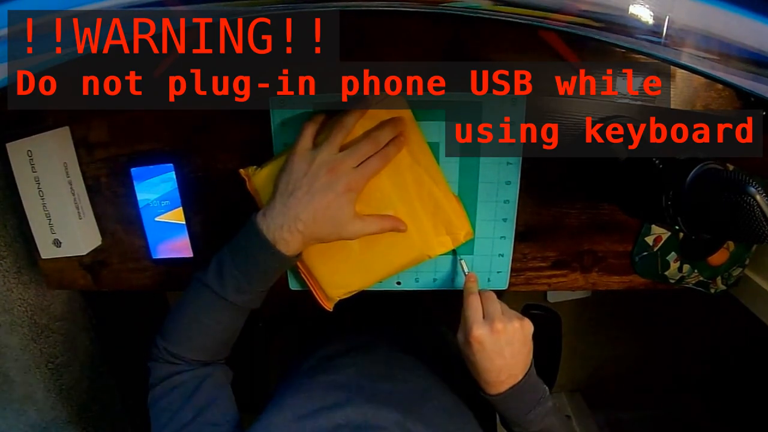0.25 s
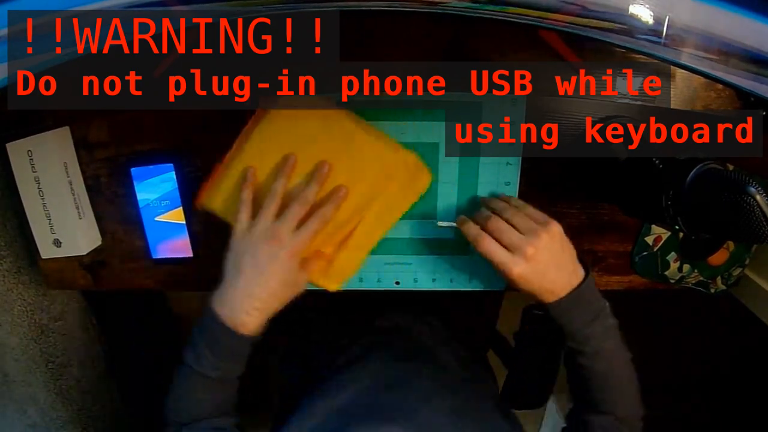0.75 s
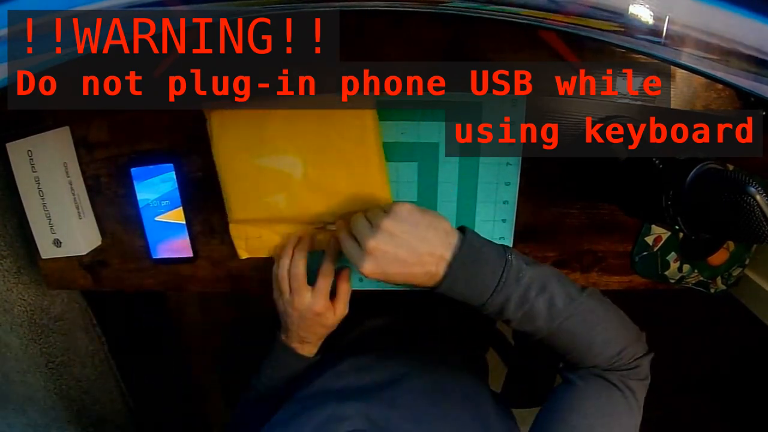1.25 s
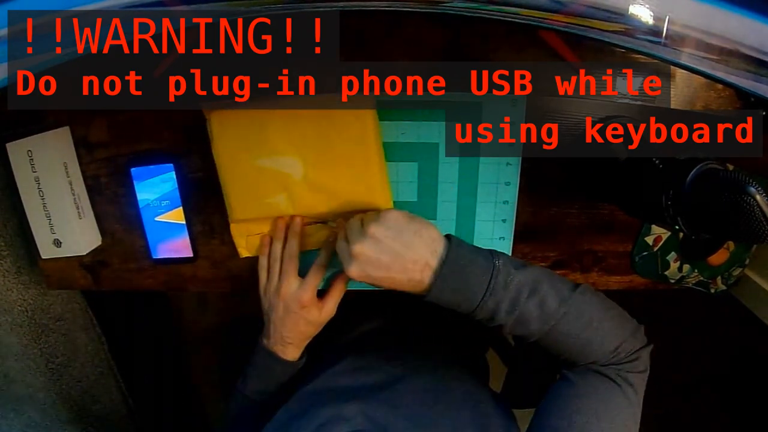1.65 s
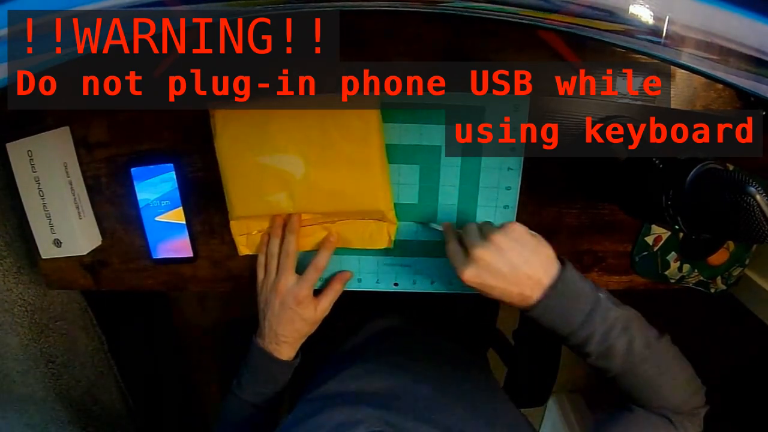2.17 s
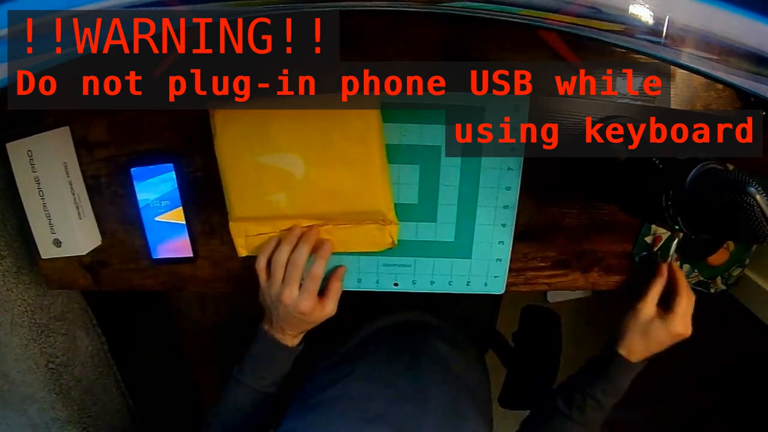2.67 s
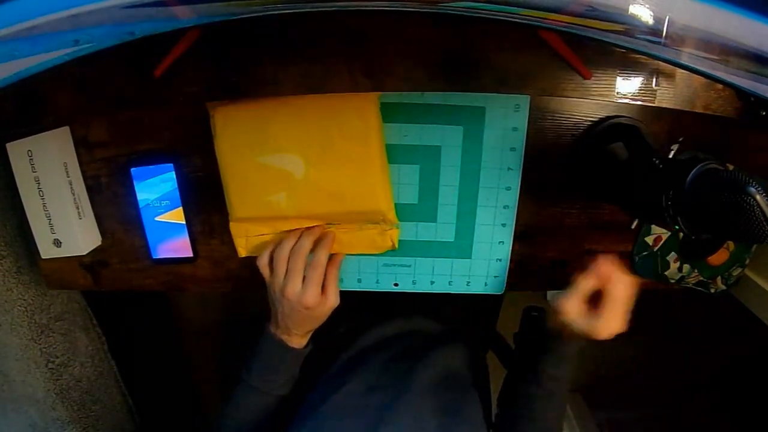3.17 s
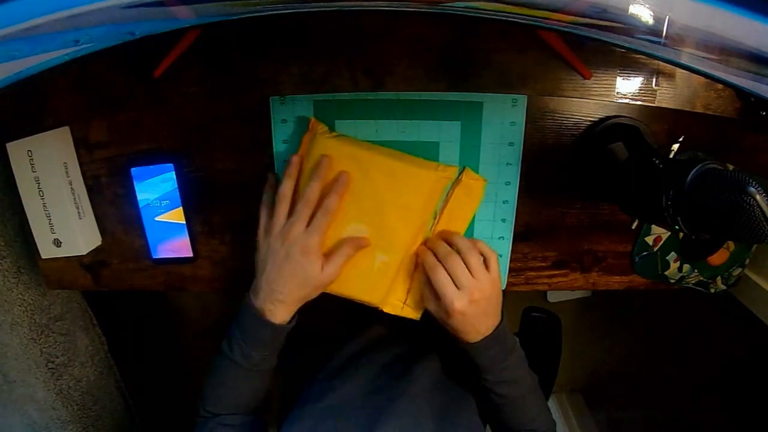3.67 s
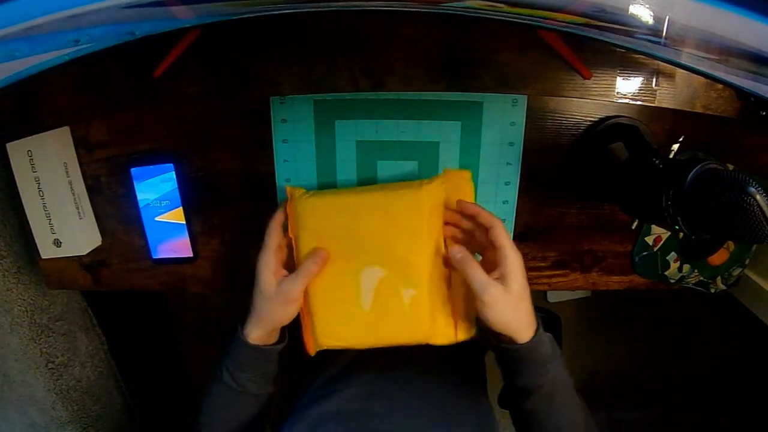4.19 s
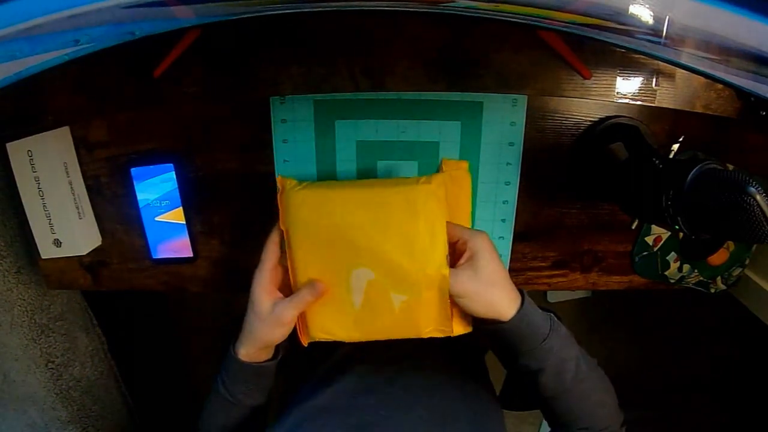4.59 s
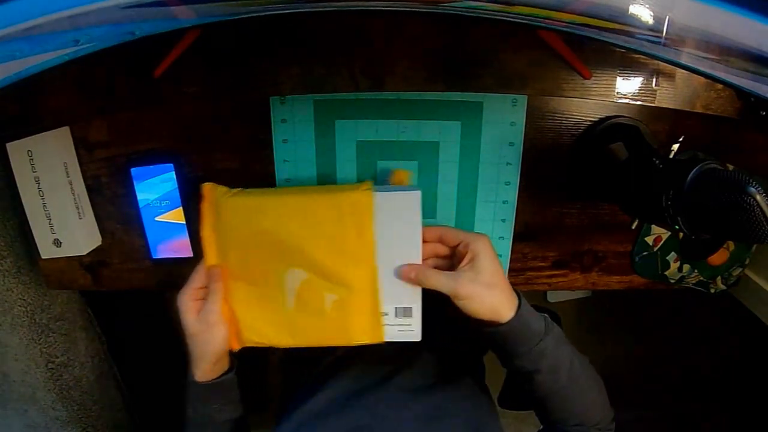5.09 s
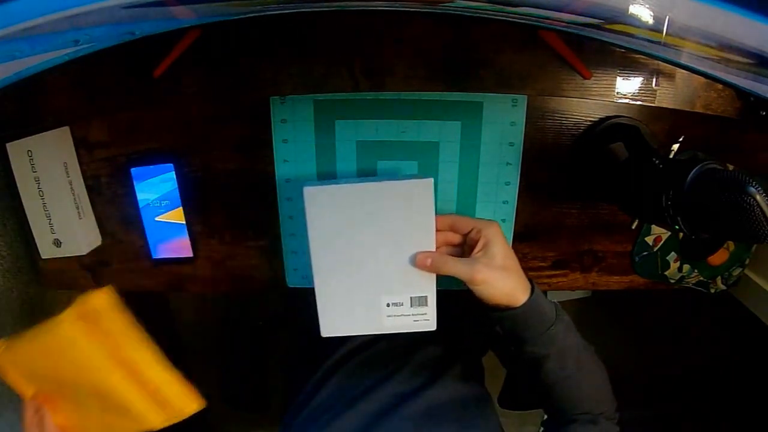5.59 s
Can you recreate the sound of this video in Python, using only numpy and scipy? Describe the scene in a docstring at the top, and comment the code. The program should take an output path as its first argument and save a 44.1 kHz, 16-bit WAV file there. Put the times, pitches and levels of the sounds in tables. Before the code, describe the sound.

In a small, quiet room, hands shift a padded paper envelope in uneven, crackly bursts, then cut it open with a brief rasp. Two dull knocks ring the desk top, and the paper rustles and snaps again as it is opened and emptied. Deep thumps from the movements reach the nearby microphone through its desk stand, and the sound cuts out once, very briefly, early on.

```python
"""At a desk in a small, quiet room, a padded paper mailer is turned, slit and emptied.
The paper rustles as its fibres slip in many tiny jerks, and snaps when a crease buckles.
Knocks make the desk top ring. The desk also carries the microphone arm, which sways at two
low pitches when pushed. The sound drops out once for a fifth of a second."""
import sys
import numpy as np
from scipy import signal
from scipy.fft import rfft, irfft
from scipy.io import wavfile
from scipy.ndimage import uniform_filter1d

SR = 44100
rng = np.random.default_rng(int(sys.argv[2]) if len(sys.argv) > 2 else 0)


def store_pcm(level_fs):
    """Save levels as 16-bit WAV."""
    pcm = np.round(np.clip(level_fs, -1, 1) * 32767).astype(np.int16)
    wavfile.write(sys.argv[1], SR, np.atleast_2d(pcm).T)


N = 257544


def undb(db):
    """Turn decibels into a factor to multiply by."""
    return 10 ** (np.asarray(db) / 20)


def unit(x):
    """Scale a signal to an average power of 1."""
    return x / np.sqrt(np.mean(x ** 2))


def band(x, hz, width):
    """Keep the sound near one pitch, in a band `width` Hz wide."""
    return signal.lfilter(*signal.iirpeak(min(hz, .4 * SR), hz / width, fs=SR), x)


def walk(rate):
    """A smooth random wobble of size about 1 that takes `rate` new values a second."""
    hold = int(SR / rate)
    steps = np.repeat(rng.standard_normal(N // hold + 1), hold)
    return unit(uniform_filter1d(uniform_filter1d(steps, hold), hold)[:N])


def add(out, s, sound):
    """Mix a sound in at s seconds."""
    start = int(s * SR)
    out[start:start + len(sound)] += sound[:N - start]


def swell(s, db, rise_s, hold_s, fall_s, bend=0.):
    """Power of one movement: rise, hold, fall. Slopes take rise_s and fall_s per 20 dB, less if bent."""
    t = np.arange(N) / SR - s
    before, after = -t / max(rise_s, .002), (t - hold_s) / max(fall_s, .01)
    away = np.maximum(np.maximum(before, after), 0)
    return undb(2 * db - 40 * away * (1 + bend * away))


def air():
    """Quiet, mostly deep room noise and a faint hum."""
    # how strong the noise is from low to high: (pitch [Hz], relative level [dB])
    noise_shape = [(47, -28), (80, -2.5), (133, 0), (395, -16.5), (575, -26), (672, -27), (751, -25.5),
                   (1820, -39), (6590, -42.5), (16000, -49.5)]
    # tones of the hum: (pitch [Hz], level [dB])
    hum_tones = [(120, -71.5), (265, -77)]
    noise_db, t = -63.5, np.arange(N) / SR
    shape_hz, shape_db = np.array(noise_shape).T
    hz = np.fft.rfftfreq(N, 1 / SR) + 1
    colour = undb(np.interp(np.log(hz), np.log(shape_hz), shape_db))
    hum = sum(undb(db + 2 * walk(12)) * np.sin(2 * np.pi * pitch * t) for pitch, db in hum_tones)
    return undb(noise_db) * unit(irfft(rfft(rng.standard_normal(N)) * colour, N)) + hum


def room(x):
    """Add the short echo of a small room, duller than the direct sound."""
    echo_db, fade_s = -20, .15
    t = np.arange(int(.3 * SR)) / SR
    tail = band(rng.standard_normal(len(t)), 1990, 8500) * undb(-60 * t / fade_s) * (t > .004)
    return x + undb(echo_db) * signal.fftconvolve(x, tail / np.linalg.norm(tail))[:N]


def arm_levels():
    """Levels in dB of the arm's slow and quick sway: each push builds up, holds and dies away."""
    # pushes on the arm: (time of full swing [s], slow sway [dB], quick sway [dB], hold [s])
    pushes = [(0.0, -33.5, -38.5, 0.004), (0.16, -35.5, -37, 0.0054), (0.393, -36.5, -34, 0.021),
              (0.492, -29, -39, 0.0038), (0.608, -36, -36, .005), (0.729, -38.5, -50, .005),
              (0.854, -40.5, -44.5, .03), (0.996, -53.5, -53.5, 0.027), (1.125, -42, -41, 0.18),
              (1.54, -50, -58, 0.087), (1.713, -29, -31, 0.0033), (1.863, -46, -51, 0.18),
              (2.07, -48, -32, 0.096), (2.165, -32.5, -42.5, 0.14), (2.291, -31, -30, 0.004),
              (2.488, -45.5, -47.5, 0.075), (2.628, -48, -47, 0.023), (2.722, -47.5, -64, .005),
              (2.86, -52, -71.5, 0.17), (3.216, -49, -48.5, 0.0045), (3.408, -44.5, -46, 0.08),
              (3.724, -54, -51, 0.09), (3.948, -26.5, -28, 0.038), (4.096, -34.5, -40, 0.0046),
              (4.205, -36, -42.5, 0.019), (4.314, -38, -45, 0.0062), (4.45, -48, -52.5, 0.087),
              (4.582, -47, -64, 0.033), (4.655, -39, -45, .005), (4.707, -36.5, -45.5, 0.072),
              (4.864, -36, -34, 0.027), (5.0, -41.5, -55, .03), (5.09, -52, -46, .03),
              (5.17, -29, -31.5, 0.0056), (5.328, -35, -40, 0.0046), (5.495, -33, -34.5, 0.021),
              (5.645, -46, -51, 0.061), (5.796, -48, -48.5, 0.047)]
    rise_s, slow_fall_s, quick_fall_s = .03, .16, .12
    slow_rest_db, quick_rest_db = -59.5, -68.5
    slow, quick = undb(2 * slow_rest_db), undb(2 * quick_rest_db)  # doubling the dB gives power
    for s, slow_db, quick_db, hold_s in pushes:
        slow = slow + swell(s, slow_db, rise_s, hold_s, slow_fall_s)
        quick = quick + swell(s, quick_db, rise_s, hold_s, quick_fall_s)
    return 10 * np.log10(slow), 10 * np.log10(quick)


def arm_sway(slow_db, quick_db):
    """The arm swings at two low pitches that wander at random; a dull rumble follows the slow one."""
    slow_hz, quick_hz, wander, rumble_db = 43.3, 63, .0854, -7.5
    tones = 0
    for hz, db in (slow_hz, slow_db), (quick_hz, quick_db):
        pitch = hz * (1 + wander * walk(12))
        tones = tones + undb(db) * np.sqrt(2) * np.sin(2 * np.pi * np.cumsum(pitch) / SR)
    rumble = unit(band(band(rng.standard_normal(N), 35, 27), 38, 38))
    return tones + undb(slow_db + rumble_db) * rumble


def desk_drone(paper_db, arm_db):
    """Sliding paper and the swaying arm keep the desk top humming near its strongest tone."""
    power = undb(2 * (paper_db - 10.5)) + undb(2 * (arm_db - 25.5))
    return np.sqrt(power) * unit(band(band(rng.standard_normal(N), 186, 70), 186, 70))


def desk_knocks():
    """Each knock rings the desk top's own tones; a harder knock favours the high ones."""
    # knocks on the desk: (time [s], level [dB], hardness [dB per octave])
    knocks = [(0.388, -33.5, -14), (0.474, -40.5, 0), (0.594, -43.5, 6), (1.711, -28, -2), (2.174, -43, -5),
              (3.296, -24.5, 2), (3.407, -24.5, 6.5), (3.937, -43.5, -6), (4.016, -42.5, -6),
              (4.185, -42.5, 6), (4.861, -42, 2), (5.02, -45, 16.5), (5.116, -48, 12), (5.365, -51, 11),
              (5.475, -43, 6.5), (5.719, -46, 7)]
    # tones of the desk top: (pitch [Hz], level [dB], time to fade by 60 dB [s])
    desk_tones = [(191.4, 1.5, 0.19), (202, -0.5, 0.086), (135, -8.5, 0.15), (309, -7, 0.098),
                  (407, -16, 0.044), (570, -16.5, 0.081)]
    out, t = np.zeros(N), np.arange(12000) / SR
    main_hz, onset = desk_tones[0][0], 1 - np.exp(-t / .0039)
    for s, db, hardness in knocks:
        ring = 0
        for hz, tone_db, fade_s in desk_tones:
            fading = undb(tone_db + hardness * np.log2(hz / main_hz) - 60 * t / fade_s)
            ring = ring + fading * np.sin(2 * np.pi * hz * t)
        add(out, s, undb(db) * ring * onset)
    return out


def handling():
    """Strokes set the rustle's level; the loudest ones decide its brightness, weight and crackle."""
    # strokes of hand and blade on the paper: (time of full level [s], level [dB], rise [s], hold [s],
    # fall [s], brightness of the highs [dB], weight of the lows [dB], crackle [dB])
    strokes = [(0.0, -36.5, .05, 0.0014, 0.02, -10, 5, 1), (0.09, -52, 1, .02, 0.12, -15, 5.5, 1.5),
               (0.2, -46.5, 0.8, 0.025, 0.11, -18.5, -10.5, 2),
               (0.385, -43, .01, 0.023, 0.06, -11, 4.5, 2.5),
               (0.474, -57.5, -0.05, .03, -0.02, -12, 10, 1.5), (0.603, -58, 0.26, 0.018, 0.12, -10, 5, 2),
               (0.7, -67.5, 0.3, 0.076, 0.2, -8.5, 2, 2.5), (0.81, -55.5, 0.08, 0.018, -0.01, -3, 9, 1.5),
               (0.856, -42.5, .08, .13, 0.105, -7.5, -5.5, 0.8), (1.096, -58, -0.16, .015, 0.1, -2.5, 2, 2),
               (1.514, -58, 0, 0.0029, 0.2, -14.5, 4, 2), (1.677, -61, 0.2, 0.039, -0.2, -4.5, -2, 3.5),
               (1.708, -43.5, 0.0268, .01, 0.13, -11.5, 5.5, 3.5), (1.871, -62.5, .1, .04, -1.5, -5, -5, 4),
               (1.95, -54.5, 0.07, .03, 0.53, -2, -1, 4.5), (1.999, -43, 0.0567, 0.17, -0.01, -4, 2, 1.5),
               (2.16, -35, 0.1948, .085, 0.0757, -6, 7.5, 2.5),
               (2.302, -53.5, 0.7, .01, 0.23, -20.5, -4, 2.4), (2.545, -59.5, 0.12, .02, 0.14, -4.5, 1, 1),
               (2.678, -58, 0.46, .02, 0.13, -7, -8, 2), (2.84, -69.5, -0.7, 0.011, 0.3, -2.5, 17, 2),
               (3.193, -67.5, -1, 0.041, -0.55, -4, -4, 2.5), (3.3, -72, 0.07, .055, 0.3, -12, 22, 1.5),
               (3.361, -42, 0.01, .015, 0.0761, -29, 12, 2), (3.406, -35.5, 0.0179, 0.026, .13, -6.5, 0, 3),
               (3.46, -37, .045, 0.032, 0.1062, -22, -2, 1.4), (3.67, -63, 0.15, .03, 0.15, -2.5, -8, 3.5),
               (3.85, -69.5, 0.2, 0.036, .1, 0.5, 2, 3), (3.935, -64.5, 0.06, .015, -0.2, 2, -3, 2.5),
               (4.008, -52, 0.04, .01, 0.8, -8.5, 0.5, 2.5), (4.12, -53.5, .1, 0.059, -0.07, 2, -2, 1.5),
               (4.2, -42.5, 0.04, 0.027, 0.08, -4, -0.5, 0.8),
               (4.29, -51.5, 0.11, 0.065, 0.06, 1, -3.5, 0.5), (4.4, -55.5, .1, .04, 0, -1.5, .6, 0.2),
               (4.575, -61.5, -0.3, 0.046, .1, 2, -1.5, 2), (4.635, -51, -0.1, .03, -0.1, 0, 7, 2),
               (4.7, -52, 0.04, .06, 0, -6.5, -3, 2.5), (4.798, -45, 0.07, .01, 0.15, -6, 0, 2.5),
               (4.949, -38.5, 0.04, .015, 0.29, -9.5, 1, 3.5),
               (5.044, -42.5, 0.03, 0.059, 0.22, -4.5, 3.5, 1.5), (5.22, -45, 0.1, .04, 0.46, -10, 0, 2),
               (5.284, -41, -0.15, .01, .11, -15, 1, 3.5), (5.357, -51, -0.2, 0.046, -0.1, -14, 26, 1.5),
               (5.481, -46, 0.28, .015, 0.06, -4, 4, 2), (5.575, -59, 1.04, 0.1, 11, -2, 3, 2.5),
               (5.722, -51.5, -0.13, 0.0091, 0.2, -0.5, -3, 3),
               (5.768, -50, -0.05, 0.0156, .15, -2, 0.55, 2.5)]
    rest_db, rest_colour = -77.5, (.3, 9, 3)  # paper settling between strokes: brightness, weight, crackle
    bend = .3  # steeper edges: the hand starts from rest and comes to rest
    powers = np.array([swell(*row[:5], bend) for row in strokes] + [np.full(N, undb(2 * rest_db))])
    colours = np.array([row[5:] for row in strokes] + [rest_colour])
    total = powers.sum(axis=0)
    return 10 * np.log10(total), *(colours.T @ powers / total)


def slips(crackle_db):
    """Sizes of slips about a millisecond long: mostly small, a few much larger."""
    chance = np.repeat(rng.exponential(size=N // 40 + 1), 40)[:N]
    size_db = np.clip(crackle_db, 0, 4.5) * np.minimum(chance, 4.)
    size = uniform_filter1d(undb(size_db), size=24)
    return size / np.sqrt(uniform_filter1d(size ** 2, size=4000))  # keep the average power near 1


def paper_rustle(level_db, bright_db, weight_db, crackle_db):
    """Fibres slip in tiny jerks, some heard in all bands, others in one; each band also flickers."""
    # bands of the paper's noise: (centre [Hz], width [Hz], level [dB])
    paper_bands = [(372, 325, -13.5), (730, 320, -14), (1100, 460, -10), (1715, 540, -10.5),
                   (3150, 2000, -4), (6150, 3230, -2.5), (8330, 2000, -11.5), (12040, 11000, -10.5)]
    middle_hz, flicker_db = 2000, 1.5
    shared_slips, out = slips(crackle_db), 0
    for hz, width, db in paper_bands:
        height = np.log2(hz / middle_hz) / 2  # 1 is two octaves above the middle
        tilt_db = bright_db * np.clip(height, 0, 1) + weight_db * np.clip(-height, 0, 1)
        crackle = shared_slips * slips(1.5 * crackle_db) * rng.standard_normal(N)
        noise = unit(band(band(crackle, hz, width), hz, 2 * width))
        out = out + undb(db + tilt_db + flicker_db * walk(30)) * noise
    return out * undb(level_db)


def paper_ticks(level_db):
    """Rows for small extra snaps at random times, louder where the rustle is louder."""
    ticks_per_s, rows = 9, []
    for when, ring, octave, crack, fizz, length in rng.random((ticks_per_s * N // SR, 6)):
        top_db = level_db[int(when * N)] + 7
        rows.append((when * N / SR, top_db - 6.5 - 30 * ring, 1000 * 2 ** octave, top_db - 12.5,
                     top_db - 22.5 * crack, top_db - 22.5 * fizz, .0046 + .0089 * length))
    return rows


def paper_snaps(level_db):
    """A crease buckles: one sharp click, then a short rattle; the sheet rings briefly at its own pitch."""
    # buckling creases: (time [s], ring level [dB], ring pitch [Hz], thud [dB], crack [dB], fizz [dB],
    # time to fade by 60 dB [s])
    creases = [(0.081, -33, 1160, -35, -41, -51, 0.015), (0.149, -44, 1410.0, -41.5, -43.0, -46, 0.026),
               (0.1744, -39, 1280.0, -56, -34, -49.5, 0.012),
               (0.1876, -25.5, 1650.0, -42, -29.5, -43, 0.009), (0.3689, -48, 1753, -60, -46, -53, 0.012),
               (0.3793, -16, 1066, -25.5, -13, -13, 0.014), (0.478, -28, 1060, -35, -31.5, -43, 0.013),
               (0.5818, -43, 1220, -61, -44, -60, 0.0087), (0.597, -26, 1540, -33.5, -31.5, -42, 0.0093),
               (0.774, -58, 1780.0, -70, -47, -48.5, 0.031), (0.7997, -30, 1210, -44, -32.5, -36, 0.019),
               (0.917, -36, 1200, -48, -41, -37, 0.029), (0.9923, -30, 1140, -63, -19.5, -42, 0.0085),
               (1.0896, -30, 1346, -45, -21, -18, 0.011), (1.483, -41.5, 1140, -41, -54, -63.5, 0.0058),
               (1.6615, -71, 870, -42.5, -51, -53, 0.021), (1.6961, -28.5, 1480, -29, -29, -58, 0.057),
               (1.7011, -14, 1830, -29.5, -21, -21, 0.025), (1.854, -45.5, 1670, -64, -53, -50, 0.016),
               (1.9382, -56, 1610.0, -70, -35.5, -32.5, 0.014), (1.9933, -28, 2180, -69, -49, -32, 0.0059),
               (2.0257, -27.5, 1270, -29.5, -24.5, -27.5, 0.025),
               (2.0451, -24.5, 1840, -42, -29, -33, 0.048), (2.118, -28, 1360, -28, -25, -30, 0.039),
               (2.1351, -23.5, 1970, -31, -24, -25.5, 0.029), (2.1543, -24, 2000, -33, -24, -26.5, 0.11),
               (2.176, -41, 1320, -33, -20, -26, 0.011), (2.1971, -19.5, 1870, -26, -38, -20, 0.022),
               (2.2286, -25, 1750, -42, -17, -32, 0.0043), (2.2365, -22, 1810, -29, -33, -27, 0.017),
               (2.245, -20.5, 1720, -33, -15, -18.5, 0.026), (2.2654, -32, 1870, -46, -35, -41, 0.025),
               (2.4005, -41, 1540, -53, -47, -35, 0.016), (2.4541, -51, 1290, -42, -47.5, -49, 0.014),
               (2.5373, -33, 1680, -46, -32.5, -42, 0.0094), (2.6582, -27.5, 1620, -43, -23.5, -28, 0.016),
               (2.7674, -52, 1030, -78, -53, -69, 0.059), (2.824, -54.5, 1780, -65, -51, -55.5, 0.031),
               (3.294, -61, 980, -42.5, -65, -61, 0.026), (3.3602, -31, 1640, -37.5, -36.5, -55, 0.043),
               (3.4031, -20, 920, -39, -14, -18.5, 0.024), (3.4332, -36, 970, -31.5, -25.5, -57, 0.15),
               (3.5601, -43, 1480, -54.0, -45, -43, 0.023), (3.708, -66.5, 1270, -63, -49, -53, 0.011),
               (3.9324, -72, 2000, -55, -46, -40.5, 0.013), (4.0129, -21.5, 2800, -39, -27.5, -35, 0.02),
               (4.0648, -36, 1180, -34, -35, -48.5, 0.011), (4.076, -59, 1670.0, -58, -52, -35.5, 0.019),
               (4.1066, -43, 1370.0, -50, -47, -41, 0.029), (4.189, -38, 1360, -27.5, -25, -30, 0.027),
               (4.197, -34, 1010, -29.5, -24, -53, 0.028), (4.5627, -56, 1150, -51.5, -58, -58, 0.017),
               (4.5902, -33.5, 1790, -60, -40, -54, 0.011), (4.636, -47, 1440, -43, -37, -43, 0.091),
               (4.7315, -38, 1370, -38.5, -34.5, -53, 0.023), (4.928, -37, 1500.0, -47, -36, -44, 0.0092),
               (4.942, -26.5, 1450, -40, -33, -34, 0.032), (4.9564, -22, 1790, -26.5, -22.5, -27, 0.0043),
               (5.02, -34, 1530, -41, -30, -34, 0.031), (5.0687, -31, 1770, -36, -27, -49, 0.055),
               (5.079, -37, 1380.0, -43.5, -30, -22, 0.0068),
               (5.1095, -28.5, 1710, -37.5, -30.0, -36, 0.026),
               (5.203, -32.5, 1450, -55, -30.5, -44, 0.0058), (5.2804, -18.5, 1440, -27, -16.5, -15, 0.013),
               (5.3403, -38, 1570.0, -36, -52, -31, 0.011), (5.3708, -26, 1100, -20, -28, -33, 0.0039),
               (5.4122, -31, 1120, -39, -27, -30.5, 0.026), (5.5013, -54, 1430.0, -61.0, -46, -39, 0.013),
               (5.5569, -36.5, 1670, -44, -32.5, -40, 0.024),
               (5.621, -52, 960.0, -50.5, -51, -37.5, 0.0056),
               (5.7157, -31.5, 1760, -37.5, -23, -24.5, 0.0099),
               (5.7412, -33, 1100.0, -59, -34, -41, 0.022), (5.769, -29.5, 1640, -44, -24.5, -54, 0.014)]
    out, t = np.zeros(N), np.arange(2600) / SR
    click = 8.35 * (t == 0)
    for s, ring_db, ring_hz, thud_db, crack_db, fizz_db, fade_s in creases + paper_ticks(level_db):
        noise = rng.standard_normal(len(t))
        rattle = np.sign(noise) + .4 * noise
        burst = (click + rattle) * undb(-60 * t / fade_s)
        parts = [(ring_hz, .62 * ring_hz, ring_db), (480, 600, thud_db),
                 (3700, 2800, crack_db), (8000, 6000, fizz_db)]
        for hz, width, db in parts:
            part = band(band(band(burst, hz, width), hz, 2 * width), hz, 2 * width)
            add(out, s, undb(db) * part / np.abs(part).max())
    return out


def scene():
    """The paper is heard through the room's air; desk and arm come through the stand, with no echo."""
    level_db, bright_db, weight_db, crackle_db = handling()
    slow_db, quick_db = arm_levels()
    paper = paper_snaps(level_db) + paper_rustle(level_db, bright_db, weight_db, crackle_db)
    desk = desk_knocks() + desk_drone(level_db + weight_db / 2, quick_db)
    return (room(paper) + desk + arm_sway(slow_db, quick_db) + air())[None]


def record(dry):
    """Remove any steady offset, go silent for one short gap, then cut off the very highest sounds."""
    low_hz, top_hz, gap_start_s, gap_end_s = 2., 16300, 1.273, 1.472
    t = np.arange(N) / SR
    live = signal.sosfilt(signal.butter(1, low_hz, "high", fs=SR, output="sos"), dry)
    live = live * ((t < gap_start_s) | (t > gap_end_s))
    return signal.sosfilt(signal.ellip(10, .2, 80, top_hz, fs=SR, output="sos"), live)


dry = scene()
out = record(dry)
store_pcm(out)
```